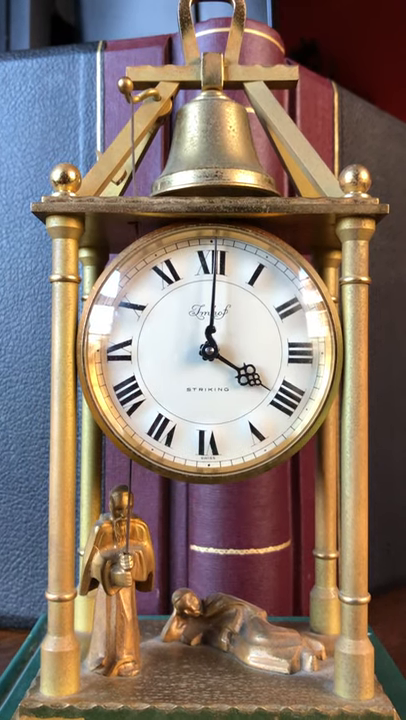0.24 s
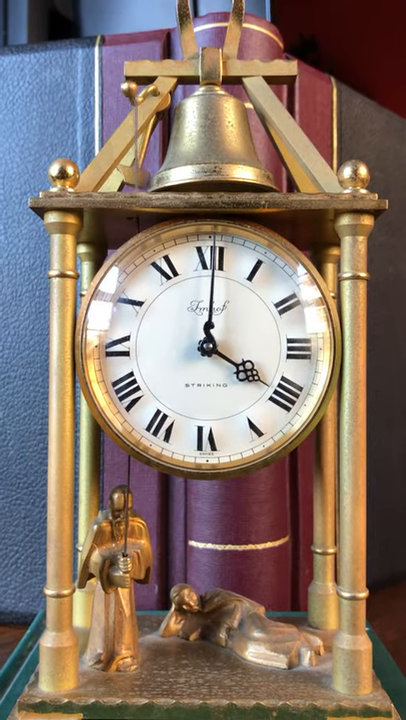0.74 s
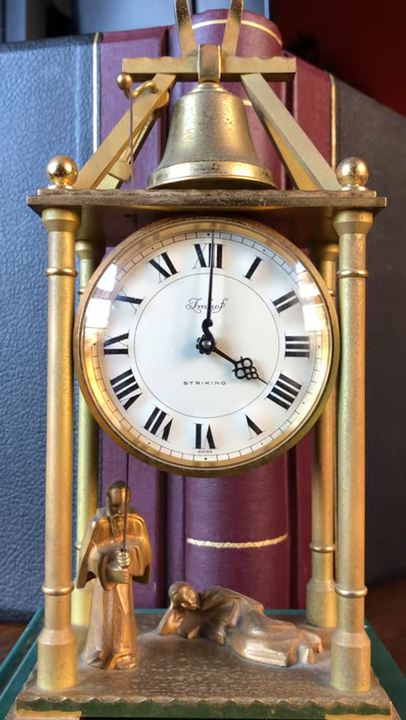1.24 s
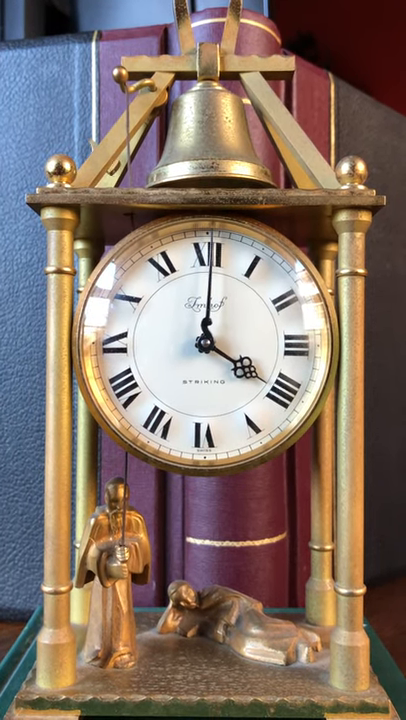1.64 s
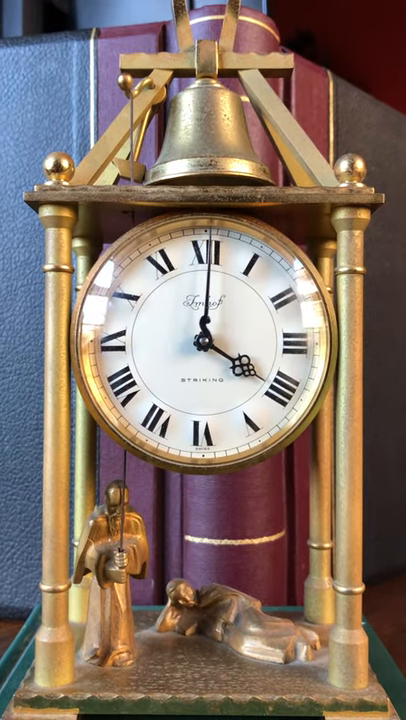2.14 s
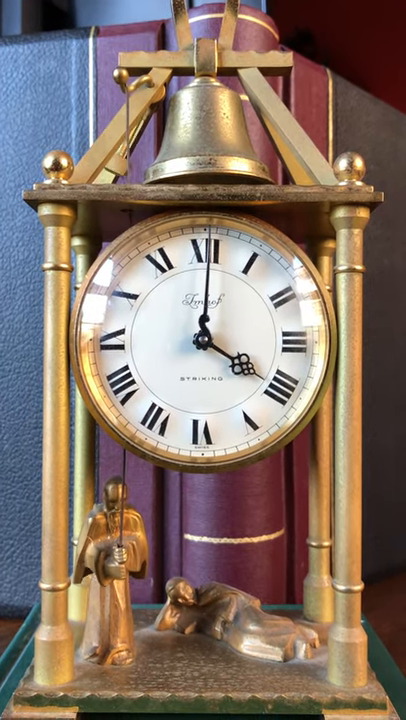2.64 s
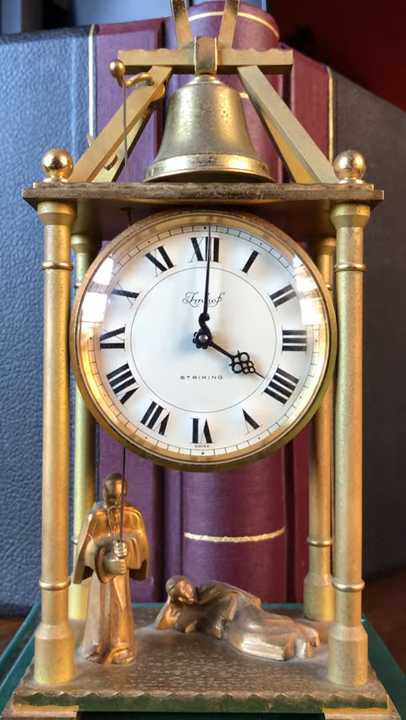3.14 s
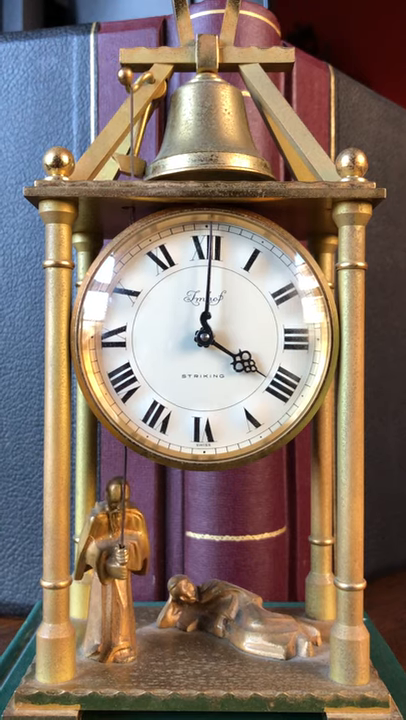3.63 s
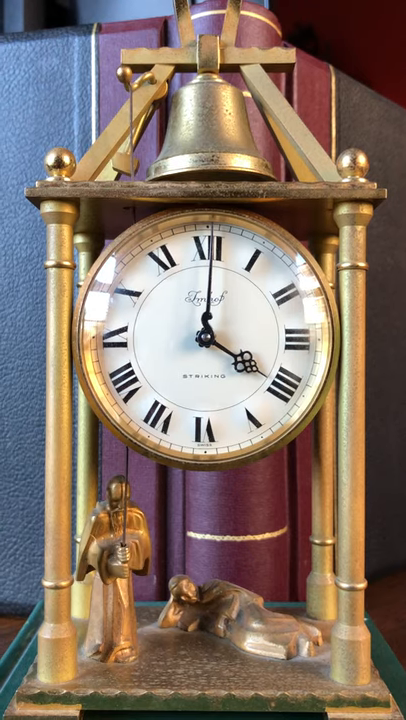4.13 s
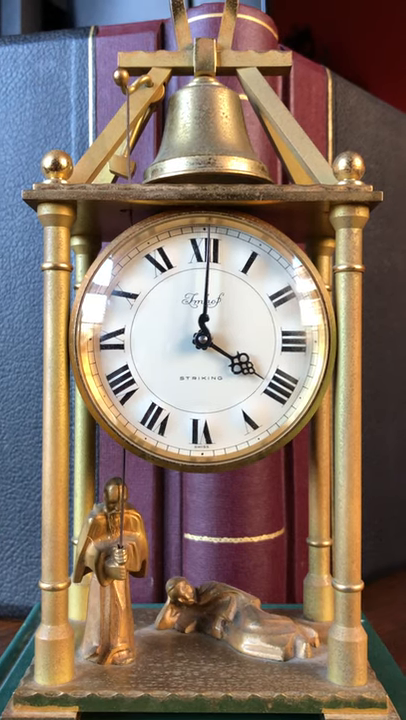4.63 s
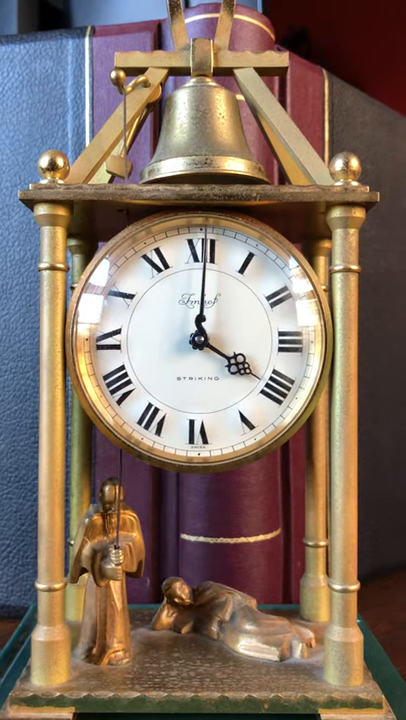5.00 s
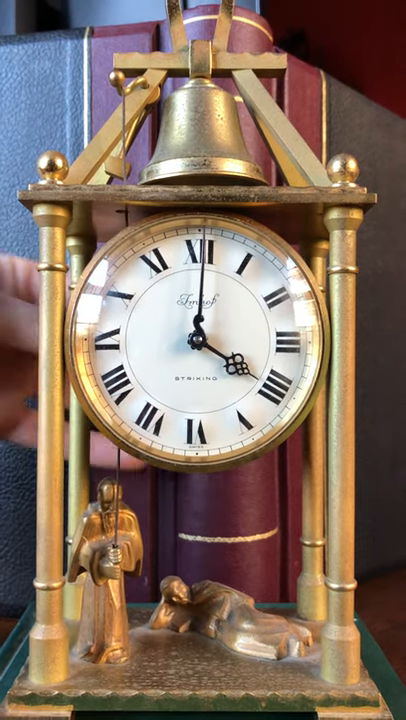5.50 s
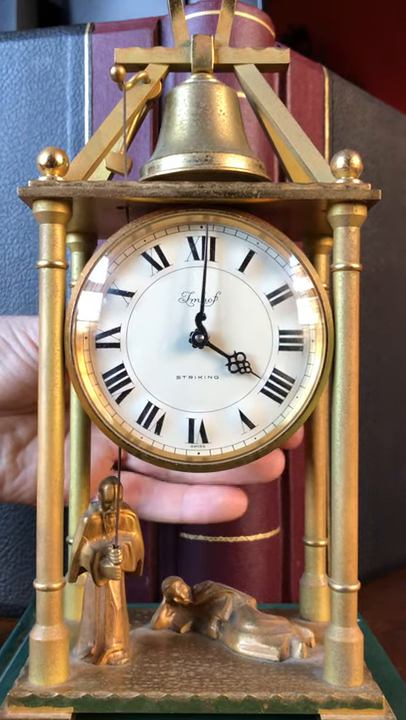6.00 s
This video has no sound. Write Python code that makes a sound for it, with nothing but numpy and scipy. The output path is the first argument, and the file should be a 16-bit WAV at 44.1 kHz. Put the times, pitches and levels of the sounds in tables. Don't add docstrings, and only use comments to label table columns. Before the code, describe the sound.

A close microphone, the same in both channels, picks up a little mechanical clock striking: steady ticks about five a second, buzzing gear teeth, and three piercing small bell notes with metallic clank and light case thud. Lever clicks come just before each blow. Gears fall silent around four seconds; ticking continues over low room hush, with a slow far-off tock, then dull finger bumps and a light rub.

```python
import sys
import numpy as np
from scipy import signal
from scipy.fft import rfft, irfft, next_fast_len
from scipy.io import wavfile

SR = 44100
rng = np.random.default_rng(int(sys.argv[2]) if len(sys.argv) > 2 else 0)


def elevation(decibels):
    levels = np.asarray(decibels, float)
    return 10 ** (levels / 20)


def pcm_store(signal):
    levels = np.round(np.clip(np.atleast_2d(signal), -1, 1) * 32767)
    wavfile.write(sys.argv[1], SR, levels.astype(np.int16).T)


N = 276065

# [t/s, level/dB, extra on 1st pair/dB, extra on 2nd pair/dB, signed share of 2nd pair's lower partner]
HAMMER_BLOWS = [
    (-.68, 0.1, 0.1, -1.1, .8),
    (.7653, -.3, -.3, -2.2, -.33),
    (2.0986, .1, -.1, .6, 1.05),
    (3.5936, .1, .6, 1.4, 1.05),
]


def unit(x):
    return x / np.sqrt(np.mean(x ** 2) + 1e-30)


def coloured(spectrum, size):
    hz, db = np.transpose(spectrum)
    padded = 2 * next_fast_len(size // 2 + 1)
    grid_hz = np.maximum(np.fft.rfftfreq(padded, 1 / SR), 1)
    gain = elevation(np.interp(np.log(grid_hz), np.log(hz), db))
    noise = irfft(rfft(rng.standard_normal(padded)) * gain, padded)
    return unit(noise[:size])


def resonance(x, hz, width_hz):
    r = np.exp(-np.pi * width_hz / SR)
    poles = [1, -2 * r * np.cos(2 * np.pi * hz / SR), r * r]
    return signal.lfilter([(1 - r * r) / 2, 0, (r * r - 1) / 2], poles, x)


def ring(clicks, hz, t60_s):
    r = elevation(-60 / (t60_s * SR))
    w = 2 * np.pi * hz / SR
    return signal.lfilter([0, np.sin(w)], [1, -2 * r * np.cos(w), r * r], clicks + 1e-18)


def swell(size, rise_s, t60_s):
    t = np.arange(size) / SR
    return (1 - np.exp(-t / max(rise_s, 1e-4))) * elevation(-60 * t / t60_s)


def add(out, s, piece):
    i = round(s * SR)
    out[i:i + len(piece)] += piece[:N - i]


def burst(db, hz, width_hz, rise_s, t60_s):
    narrow = resonance(rng.standard_normal(12000), hz, width_hz)
    band = resonance(narrow, hz, 2 * width_hz)[3000:]
    return elevation(db) * unit(band) * swell(9000, rise_s, t60_s)


def contacts(rows, gains, spread_s, count):
    clicks = np.zeros(N)
    when_s = np.array(rows)[:, 0]
    order = np.arange(count)
    late_s = np.cumsum(rng.random((len(rows), count)), axis=1) * spread_s * (order > 0)
    signs = rng.choice([-1, 1], late_s.shape)
    sizes = signs * elevation(rng.normal(0, 2.4, late_s.shape) - 3.5 * order)
    np.add.at(clicks, ((when_s[:, None] + late_s) * SR).astype(int), sizes * gains[:, None])
    return clicks


def room_tone():
    # [f/Hz, density/(dB per Hz)]
    hush = [(18, -40), (30, -16), (55, -3), (130, 1.5), (210, -4), (300, -4), (420, -12.5), (700, -12),
            (1100, -16), (2000, -22), (3400, -24), (6000, -25.5), (11000, -28.5), (16000, -29.5)]
    # [f/Hz, width/Hz, level/dB]
    hum = [(207, 14, -78), (274, 10, -78), (308, 8, -78), (345, 10, -84)]
    white = rng.standard_normal(N)
    drones = sum(elevation(db) * unit(resonance(white, hz, width_hz)) for hz, width_hz, db in hum)
    return elevation(-71.8) * coloured(hush, size=N) + drones


def bell():
    partial_hz = [3656.45, 3677.95, 8212.46, 8190.0, 10528, 10575, 13329.35, 13421.7, 14620.6, 14497.2,
                  3680.45, 8212.46, 13329.35]
    phase_turns = [0, .22, 0, .255, 0, .2, 0, -.27, 0, -.44, -.125, .49, .48]
    # [level/dB, t60/s]
    partials = [(-32.6, 2.2), (-24.2, .94), (-26.5, 1.2), (-35, .88), (-14.5, .225), (-43, .26),
                (-17.9, .47), (-35, .41), (-28.5, .38), (-39.5, .41), (-27, .25), (-29, .25), (-22.2, .12)]
    out = np.zeros(N)
    for s, db, first_db, second_db, partner in HAMMER_BLOWS:
        start = max(round(s * SR), 0)
        strength = np.ones(len(partials))
        strength[:2] = elevation(first_db)
        strength[2:4] = elevation(second_db) * np.array([1, partner])
        strength[10:12] = elevation([first_db, second_db])
        for hz, turns, (mode_db, t60_s), share in zip(partial_hz, phase_turns, partials, strength):
            stop = min(N, start + round(1.4 * t60_s * SR))
            t = np.arange(start, stop) / SR - s
            touch = np.sin(np.pi / 2 * np.clip(t / .0004, 0, 1)) ** 2
            tone = elevation(db + mode_db - 60 * t / t60_s) * np.sin(2 * np.pi * (hz * t + turns))
            out[start:start + len(t)] += share * touch * tone
    return out


def strike_train():
    # [t/s, rate/(teeth/s)]
    speed = [(0.0, 48.82), (0.4, 48.92), (0.72, 50.86), (0.95, 61.98), (1.15, 57.36), (1.45, 52.59),
             (1.75, 49.51), (2.05, 49.42), (2.3, 54.18), (2.5, 49.89), (2.75, 43.98), (3.05, 44.1),
             (3.3, 47.1), (3.55, 52.84), (3.75, 57.65), (4.03, 54.21)]
    # [level/dB, lower against upper plates/dB]
    leaves = [(-66, -2), (-69, 0.1), (-70, 1.2), (-67, 1.2), (-66, 3), (-64, 1.5), (-67, -.8), (-82, 3)]
    # [t/s, level/dB]
    load = [(0, 0.1), (1, -2.2), (2, 1.5), (2.5, -5), (3.4, 1.5), (4.03, -4)]
    first_tooth_s, spread_db = .0266, 1.3
    t = np.arange(0, speed[-1][0], 1 / SR)
    passed = np.cumsum(np.interp(t, *np.transpose(speed))) / SR
    passed -= np.interp(first_tooth_s, t, passed)
    tooth = np.arange(-1, int(passed[-1]))
    s = np.interp(tooth, passed, t)
    leaf = np.array(leaves)[tooth % len(leaves)]
    chance = rng.normal(0, spread_db, leaf.shape)
    level_db = leaf[:, 0] + np.interp(s, *np.transpose(load)) + chance[:, 0]
    return np.c_[s, level_db, leaf[:, 1] + chance[:, 1]]


def escapement():
    # [first/s, period/s, period shrink per swing/s]
    beats = [(.0649, .39574, .000258), (.256, .39515, .000206)]
    beat_lower_db = (-1.5, .8)
    beat_db, spread_db = (-54.2, -57.8), 1.2
    unlock_s, unlock_db, unlock_lower_db = .048, (-16, -11), -5
    k, rows = np.arange(16), []
    for (first_s, period_s, shrink_s), db, lower_db, lead_db in zip(beats, beat_db, beat_lower_db, unlock_db):
        chance = rng.normal(0, spread_db, (16, 3))
        s = first_s + period_s * k - shrink_s * k * (k - 1) / 2
        rows.append(np.c_[s, db + chance[:, 0], lower_db + chance[:, 1]])
        rows.append(np.c_[s - unlock_s, db + lead_db + chance[:, 2], unlock_lower_db + chance[:, 1]])
    return np.vstack(rows)


def movement():
    # [f/Hz, tick level/dB, tooth level/dB, t60/s]
    plates = [(2180, -27, -8, .04), (2850, -14, -16, .025), (3260, -8, -3, .034), (3950, -6, -13, .015),
              (4580, -11, -10, .016), (5060, -7, -.8, .028), (6170, -12, -4.5, .022), (7070, -10, -8, .024),
              (7920, -9, -14, .022), (8420, -9, -10, .026), (8700, -13, -8, .02), (9560, -9, -11, .018),
              (10780, -10, -9, .025), (11200, -7, -2.5, .036), (11520, -7, -5, .032),
              (12750, -13, -21, .022), (13400, -15, -19, .04), (14220, -10, -21, .04),
              (15300, -14, -24, .022)]
    # [f/Hz, level/dB]
    snap = [(1180, -40), (2000, -17), (3840, -4), (5300, -2), (6470, -6), (8400, -4), (11200, -4),
            (16000, -18)]
    # [t/s, level/dB]
    whirr = [(0, -76.5), (1, -77.5), (2, -76), (3, -77.5), (4.0, -78.5), (4.05, -110), (6.3, -110)]
    # [f/Hz, level/dB]
    whirr_colour = [(1200, -14), (2000, -5), (2200, 5), (2500, -6), (3300, -2), (4200, -7), (5100, -1.5),
                    (6200, -1.5), (8000, -6), (11200, -2), (13000, -12), (16000, -16)]
    ticks, teeth, out = escapement(), strike_train(), np.zeros(N)
    for hz, tick_db, tooth_db, t60_s in plates:
        lower = hz < 8000
        tick_gain = elevation(ticks[:, 1] + lower * ticks[:, 2] + tick_db + .4)
        tooth_gain = elevation(teeth[:, 1] + lower * teeth[:, 2] + tooth_db + .6)
        clicks = contacts(ticks, tick_gain, spread_s=.0016, count=5)
        clicks += contacts(teeth, tooth_gain, spread_s=.0016, count=2)
        out += ring(clicks, hz, t60_s)
    edges = np.abs(contacts(ticks, elevation(ticks[:, 1] - 2.5), spread_s=.0022, count=3))
    edges += np.abs(contacts(teeth, elevation(teeth[:, 1] - 2.5), spread_s=.0015, count=2))
    snap_envelope = signal.fftconvolve(edges, swell(1500, .0001, .014))[:N]
    out += snap_envelope * coloured(snap, size=N)
    whirr_db = np.interp(np.arange(N) / SR, *np.transpose(whirr))
    return out + elevation(whirr_db) * coloured(whirr_colour, size=N)


def pendulum_clock():
    # [t/s, level/dB]
    swings = [
        (.46, -64),
        (1.23, -64),
        (1.95, -65),
        (2.715, -64),
        (3.43, -67),
        (4.198, -64),
        (4.905, -66),
        (5.682, -62.5),
    ]
    # [f/Hz, width/Hz, level/dB]
    tick_body = [(850, 400, -1.5), (1250, 40, -1.5), (1800, 400, -5), (2450, 400, -4), (4000, 2500, -6)]
    # [f/Hz, width/Hz, level/dB]
    tock_body = [(850, 350, -2.5), (2280, 90, -1.5), (2450, 120, -3), (2850, 200, -6), (5000, 3000, -12)]
    out = np.zeros(N)
    for k, (s, db) in enumerate(swings):
        white = rng.standard_normal(16000)
        modes = (tick_body, tock_body)[k % 2]
        body = sum(elevation(mode_db) * unit(resonance(white, hz, width_hz)) for hz, width_hz, mode_db in modes)
        add(out, s, elevation(db) * unit(body) * swell(16000, .01, .36))
    return out


def hammer():
    # [t/s, peak/dB]
    slips = [
        (.7195, -49),
        (.7262, -44),
        (2.0514, -51),
        (2.0622, -47),
        (3.5483, -57),
        (3.5574, -56),
        (3.564, -52),
    ]
    # [f/Hz, level/dB, t60/s]
    wire = [(9640, 0.1, .07), (13700, -6, .06)]
    # [f/Hz, level/dB]
    clank = [(200, -34), (600, -12), (1000, -11), (1600, -19), (2500, -9), (4600, -3), (6500, -2),
             (8500, .5), (9800, -1), (12000, -9), (16000, -12)]
    # [f/Hz, level/dB, t60/s]
    bracket = [(3780, -27, .022), (4590, -50, .08), (5340, -62, .3), (6514, -56, .25), (7020, -51, .33),
               (7335, -55, .5), (7357, -55, .45), (7690, -52, .28), (8000, -42, .07), (8380, -43, .15),
               (9300, -46, .05), (2825, -52, .08)]
    # [f/Hz, level/dB, t60/s]
    thud = [(322, -32.5, .04), (333, -48, .3), (356, -54, .12)]
    thud_lag_s = .006
    out, hits, slip_clicks = np.zeros(N), np.zeros(N), np.zeros(N)
    for s, db, *_ in HAMMER_BLOWS[1:]:
        hits[round(s * SR)] = elevation(db)
        decay = elevation(-30) * swell(8000, .0005, .035) + elevation(-42) * swell(8000, .002, .22)
        add(out, s, elevation(db) * decay * coloured(clank, size=8000))
    highpass = signal.butter(2, 1800, "high", fs=SR, output="sos")
    sharp = signal.sosfilt(highpass, hits)
    out += sum(elevation(db) * ring(sharp, hz, t60_s) for hz, db, t60_s in bracket)
    late_hits = np.roll(hits, round(thud_lag_s * SR))
    push = resonance(resonance(late_hits, 325, 62), 328, 62)
    out += sum(elevation(db) * ring(push, hz, t60_s) for hz, db, t60_s in thud)
    slip_clicks[[round(s * SR) for s, db in slips]] = elevation(np.array(slips)[:, 1])
    return out + sum(elevation(db) * ring(slip_clicks, hz, t60_s) for hz, db, t60_s in wire)


def knocks():
    # [lead before blow/s, level/dB, f/Hz, width/Hz, rise/s, t60/s]
    release = [
        (.043, -53, 2400, 3500, .008, .12),
        (.04, -55, 1250, 250, .008, .1),
        (.032, -39, 6300, 2000, .001, .03),
        (.032, -46, 2900, 2200, .002, .06),
        (.0118, -42, 3500, 1600, .0004, .025),
        (.011, -51, 950, 900, .002, .085),
    ]
    # [slide/dB, latch/dB, drop/dB]
    release_db = [
        (1.5, -6, 0.1),
        (1.5, 0.1, -1.5),
        (-4, -.8, 1.5),
    ]
    release_stage = [0, 0, 1, 1, 2, 2]
    bodies = {"base": [(0.1, 615, 70, .002, .16), (-4, 800, 150, .002, .08), (-4, 1450, 1000, .002, .06)],
              "lever": [(0.1, 1900, 300, .002, .08), (-3, 800, 600, .002, .06)],
              "pin": [(0.1, 7500, 5000, .001, .025)], "finger": [(0.1, 200, 70, .005, .1)],
              "palm": [(0.1, 110, 90, .06, .9), (8, 380, 200, .03, .1)],
              "rub": [(0.1, 6000, 8000, .015, .08)], "nail": [(-2.5, 880, 160, .004, .1),
              (-3, 2300, 200, .002, .05), (2.5, 4600, 3500, .003, .045)],
              "ring": [(0.1, 3200, 400, .001, .04), (-2.2, 9500, 5000, .001, .05),
              (-19, 8000, 60, .004, .3)]}
    # [t/s, level/dB, body]
    knocks_on = [(1.02, -67, "base"), (1.03, -60, "pin"), (1.097, -61, "base"), (1.098, -58, "pin"),
                 (2.0405, -52, "pin"), (2.424, -55, "base"), (3.945, -63, "lever"), (4.94, -57, "finger"),
                 (5.692, -52, "finger"), (5.72, -66, "rub"), (5.938, -51, "finger"), (5.962, -65, "pin"),
                 (6.053, -56, "nail"), (6.104, -59.5, "ring"), (6.11, -63, "palm"), (6.148, -50, "finger"),
                 (6.175, -49, "finger")]
    out = np.zeros(N)
    for (blow_s, *_), stage_db in zip(HAMMER_BLOWS[1:], release_db):
        for (lead_s, db, *band), stage in zip(release, release_stage):
            add(out, blow_s - lead_s, burst(db + stage_db[stage], *band))
    for s, db, body in knocks_on:
        for band_db, *band in bodies[body]:
            add(out, s, burst(db + band_db, *band))
    return out


def room(x):
    tail = rng.standard_normal(16000) * swell(16000, rise_s=.006, t60_s=.25)
    tail = signal.lfilter([1], [1, -.3], tail)
    return elevation(-18.5) * signal.fftconvolve(x, tail / np.sqrt(np.sum(tail ** 2)))[:N]


def scene():
    clatter = hammer() + movement() + knocks()
    mono = bell() + clatter + room(clatter) + pendulum_clock() + room_tone()
    return np.stack([mono, mono])


def masking(x):
    mask_db, mask_db_per_octave = -22, 47
    hz, _, frames = signal.stft(x, SR, nperseg=2048)
    power = np.abs(frames[:1024]) ** 2
    band_db = 10 * np.log10(power.reshape(64, 16, -1).sum(axis=1) + 1e-20)
    band_hz = hz[8:1024:16, None]
    slope_db = mask_db_per_octave * np.log2(band_hz)
    hidden_db = np.maximum.accumulate(band_db + slope_db, axis=0) - slope_db + mask_db
    kept = (band_db > hidden_db) | (band_hz < 3900)
    kept &= band_hz < 15850
    total_db = 10 * np.log10(power.sum(axis=0) + 1e-20)
    kept |= total_db > np.roll(total_db, 2) + 10
    frames[:1024] *= np.repeat(kept, 16, axis=0)
    return signal.istft(frames, SR, nperseg=2048)[1][:N]


def low_pass(x):
    return signal.sosfilt(signal.butter(12, 16870, fs=SR, output="sos"), x)


def record(dry):
    lowpass = signal.cheby2(10, 50, 17200, fs=SR, output="sos")
    dry = signal.sosfilt(lowpass, dry)
    mix = np.stack([masking(side) for side in dry])
    return low_pass(mix)


dry = scene()
out = record(dry)
pcm_store(out)
```